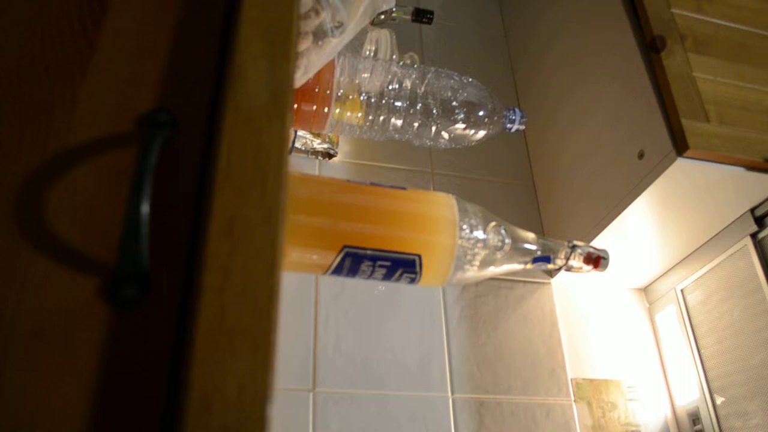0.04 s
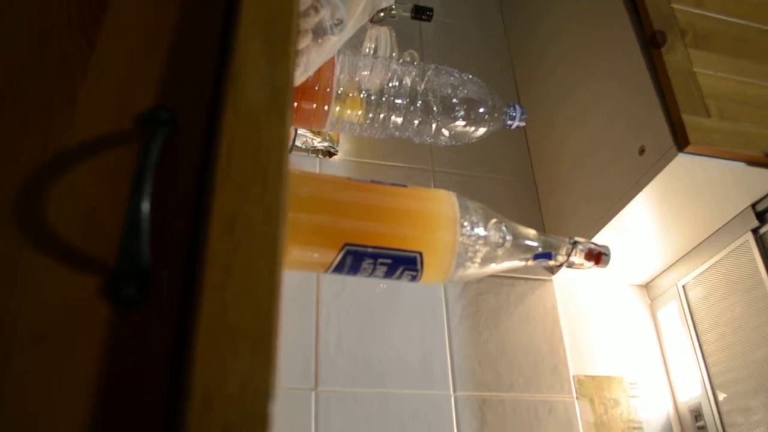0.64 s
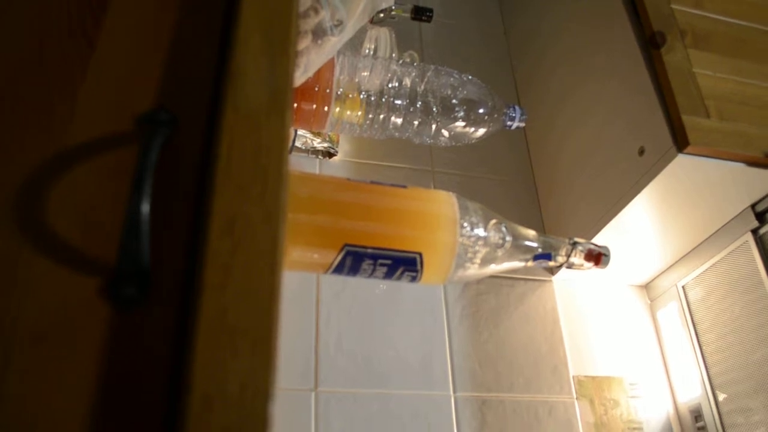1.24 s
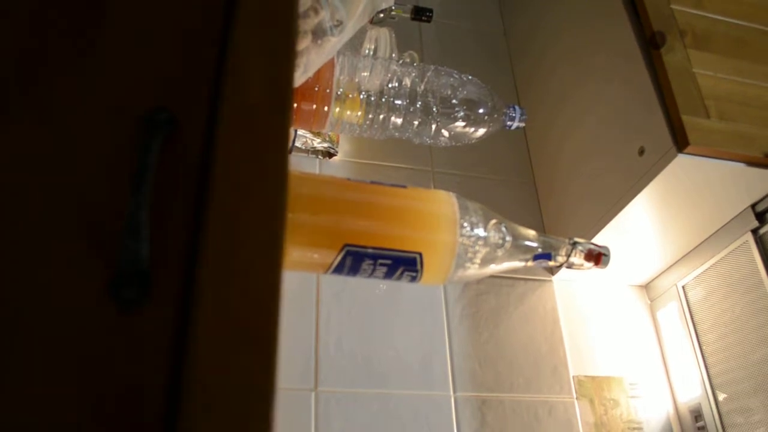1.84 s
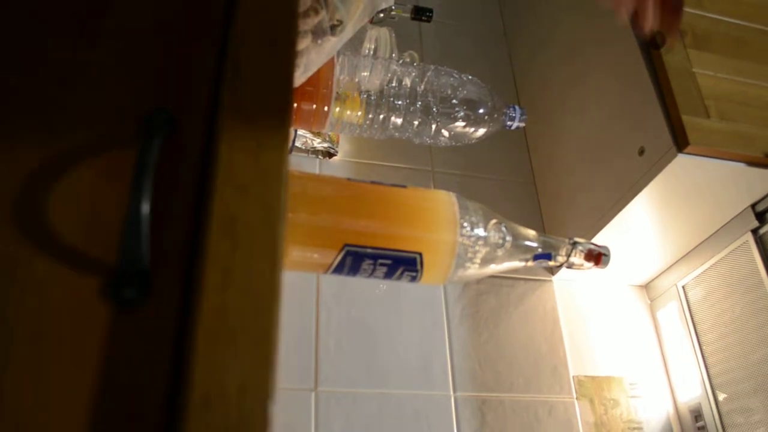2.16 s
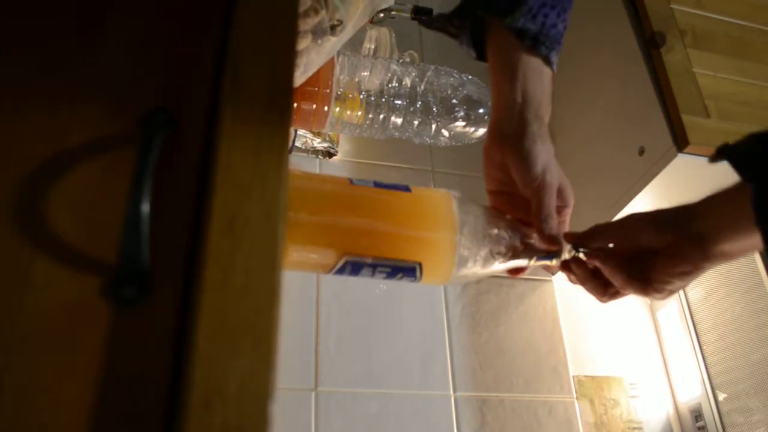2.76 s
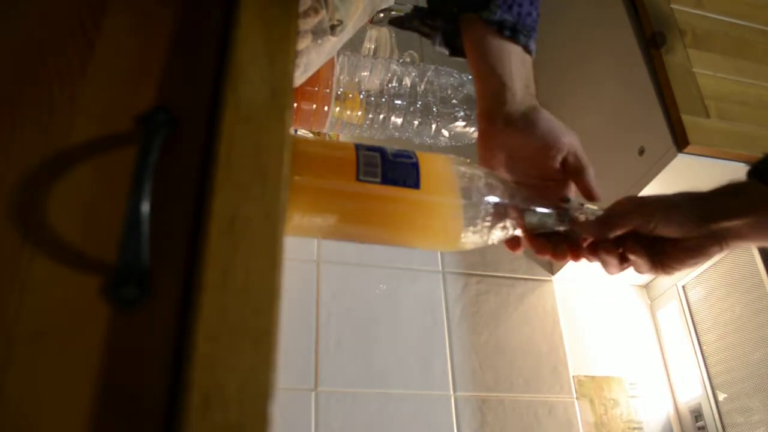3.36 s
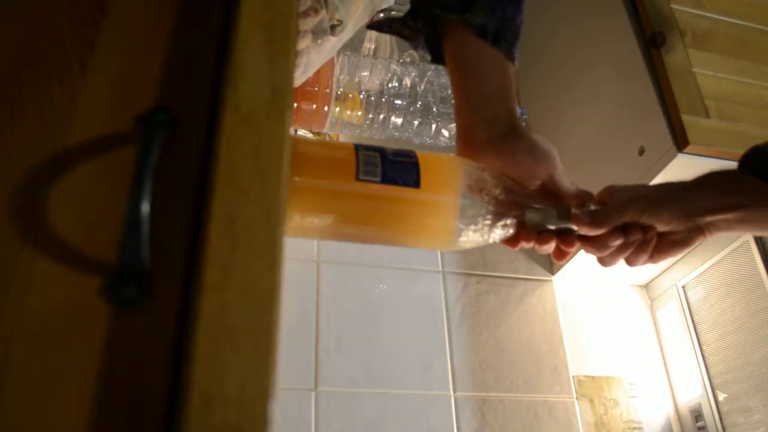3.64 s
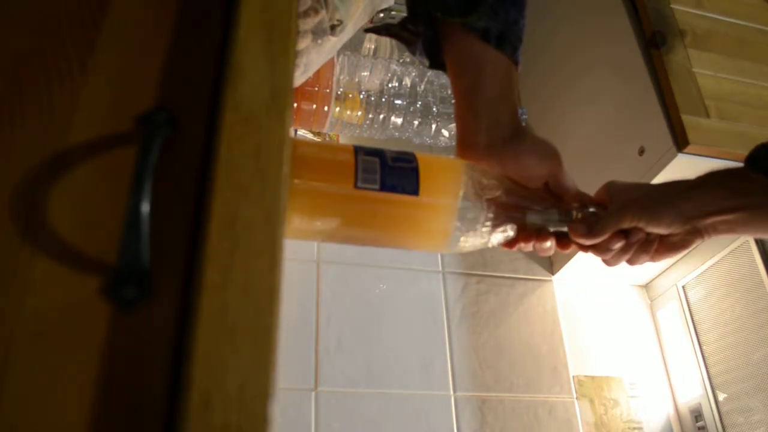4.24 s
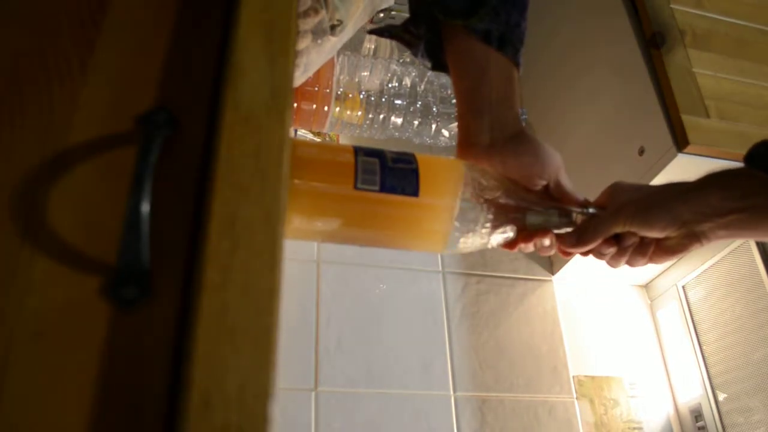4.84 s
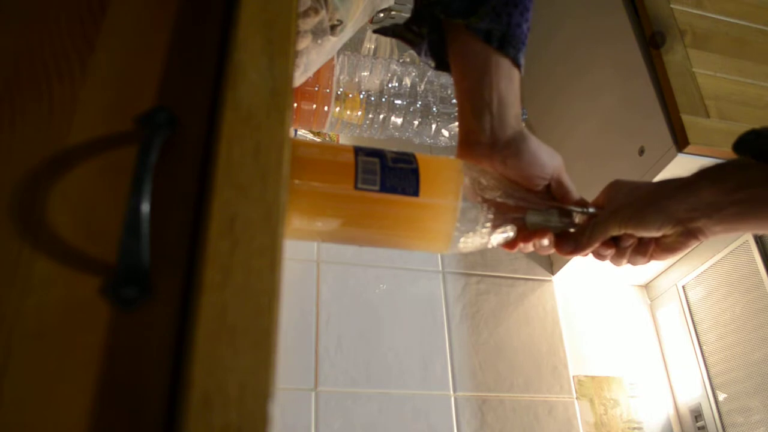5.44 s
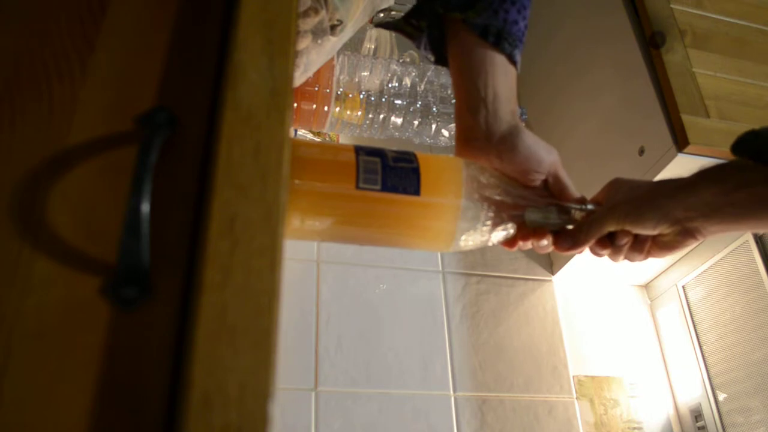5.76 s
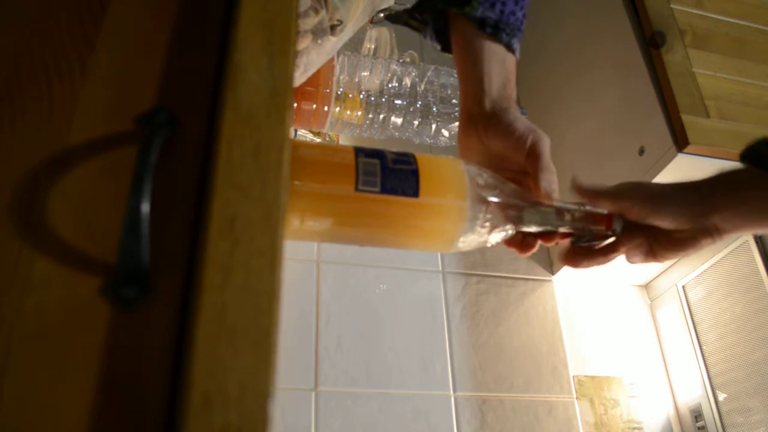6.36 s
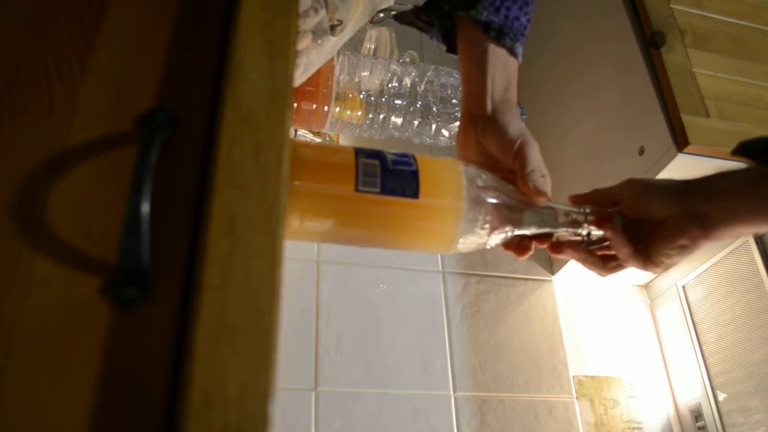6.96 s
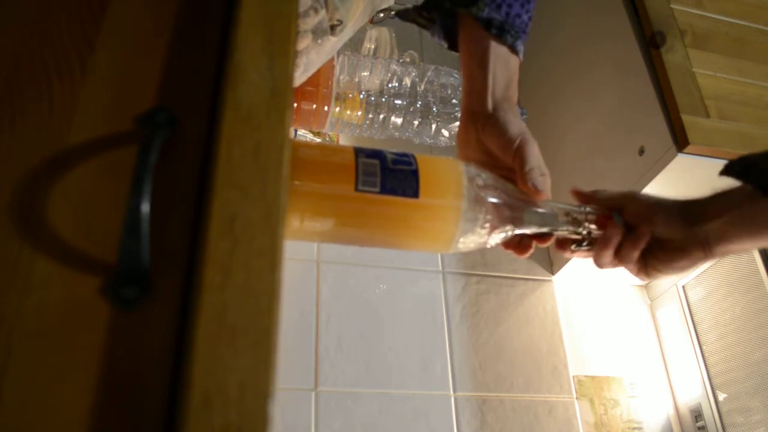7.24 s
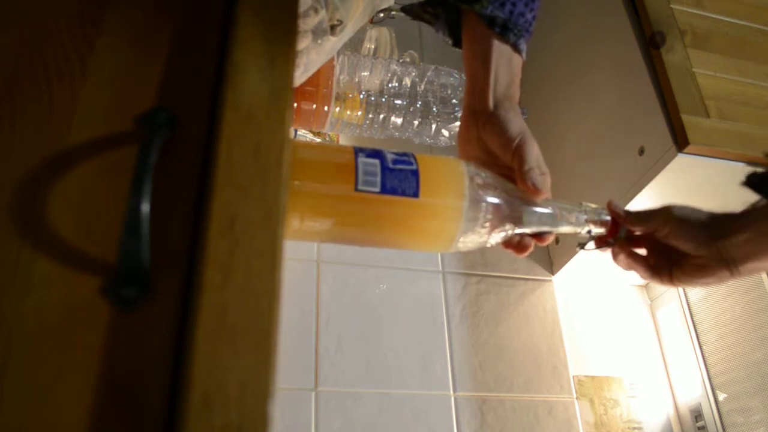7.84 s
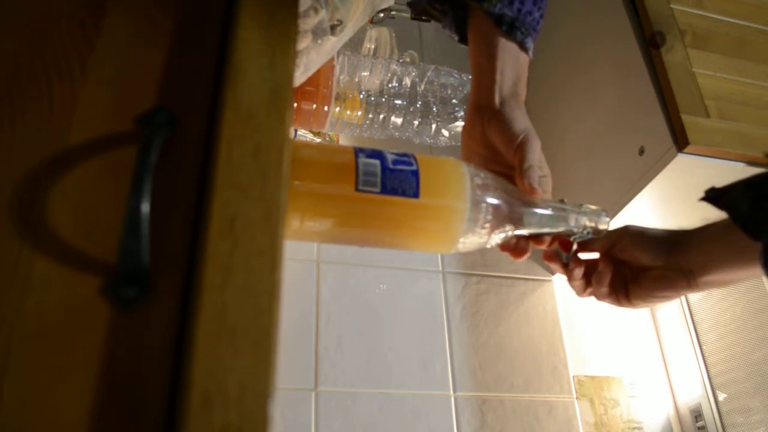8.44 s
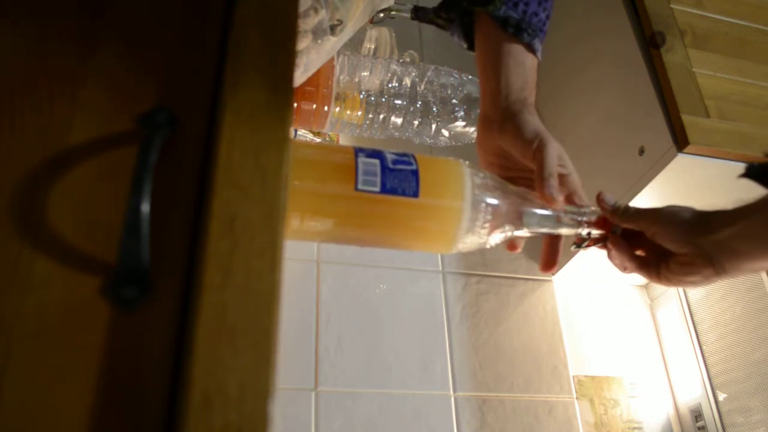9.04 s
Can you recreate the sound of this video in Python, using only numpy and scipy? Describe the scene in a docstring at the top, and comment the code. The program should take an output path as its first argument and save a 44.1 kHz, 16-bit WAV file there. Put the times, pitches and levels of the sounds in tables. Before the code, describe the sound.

In a quiet tiled kitchen, sleeves rustle faintly and a glass bottle bumps softly on the counter. Its swing-top is eased open, and gas bursts past the seal in two loud, short hisses with a hollow tone. The wire clasp then clicks and clinks against the glass among more soft bumps, and a last faint leak slips out. One microphone picks up direct sound with a short room echo.

```python
"""A swing-top glass bottle of fizzy drink, eased open on the counter of a small tiled kitchen.
Gas bursts past the rubber seal in two hisses that sound a hollow resonance at the mouth. Around them
sleeves rustle, the bottle bumps on the worktop, and the wire clasp clicks and clinks against the glass;
a last faint leak slips out. One microphone hears the counter, direct sound ahead of the echo off the
tiles, with a few small ticks close by and quiet room tone behind."""
import sys
import numpy as np
from scipy import signal
from scipy.fft import rfft, irfft, next_fast_len
from scipy.io import wavfile

SR = 44100
rng = np.random.default_rng(int(sys.argv[2]) if len(sys.argv) > 2 else 0)


def dump_mix(stems):
    """Bounce the given channels to the path in sys.argv[1] as a 16-bit WAV at rate SR."""
    frames = np.atleast_2d(stems).T  # one column per channel
    limited = np.clip(frames, -1, 1)  # hard clip at full scale
    pcm = np.round(limited * 32767).astype(np.int16)
    wavfile.write(sys.argv[1], SR, pcm)


N = 401751
TIME = np.arange(N) / SR


def from_db(db):
    """Decibels to gain."""
    return 10 ** (np.asarray(db) / 20)


def rms_one(x):
    """Scale to unit rms."""
    return x / np.sqrt(np.mean(x ** 2) + 1e-20)


def at_hz(points, hz):
    """Read a table on a log-frequency axis."""
    known_hz, values = np.transpose(points)
    return np.interp(np.log(np.maximum(hz, 1)), np.log(known_hz), values)


def noise(spectrum, skirt_db=24):
    """Steady noise of a given spectral density, falling skirt_db an octave past its ends; rms 1."""
    size = next_fast_len(N)
    hz = np.maximum(np.arange(size // 2 + 1) * SR / size, 1)
    octaves_outside = np.abs(np.log2(hz / np.clip(hz, spectrum[0][0], spectrum[-1][0])))
    gain = from_db(at_hz(spectrum, hz) - skirt_db * octaves_outside)
    return rms_one(irfft(rfft(rng.standard_normal(size)) * gain, size)[:N])


def band(x, low_hz, high_hz):
    """Band-pass filter."""
    sos = signal.butter(2, [low_hz, min(high_hz, .45 * SR)], "band", fs=SR, output="sos")
    return signal.sosfilt(sos, x)


def drift(rate_hz):
    """Smooth random wander, spread 1."""
    hop = 40
    r = np.exp(-2 * np.pi * rate_hz * hop / SR)
    slow = signal.lfilter([1], [1, -2 * r, r * r], rng.standard_normal(N // hop + 2002))[2000:]
    return np.interp(np.arange(N) / hop, np.arange(len(slow)), rms_one(slow))


def resonance(x, hz, width_hz):
    """Two-pole resonance with gain 1 at its peak."""
    r = np.exp(-np.pi * width_hz / SR)
    feedback = [1, -2 * r * np.cos(2 * np.pi * hz / SR), r * r]
    return signal.lfilter(np.array([1, 0, -1]) * (1 - r * r) / 2, feedback, x)


def strike(times, db, modes, spread_db):
    """Blows set every mode ringing, each with a random strength of its own."""
    ringing = np.zeros(N)
    for hz, mode_db, t60 in modes:
        scatter_db = spread_db * rng.standard_normal(len(db))
        blows = np.full(N, 1e-18)
        blows[(times * SR).astype(int)] = from_db(db + mode_db + scatter_db)
        r, w = 1e-3 ** (1 / (t60 * SR)), 2 * np.pi * hz / SR
        mode = signal.lfilter([0, np.sin(w)], [1, -2 * r * np.cos(w), r * r], blows)
        ringing += rng.choice([-1, 1]) * mode
    return ringing


def decays(times, db, t60):
    """Envelope that jumps at each contact and dies away."""
    jumps = np.full(N, 1e-18)
    jumps[(np.asarray(times) * SR).astype(int)] = from_db(db)
    return signal.lfilter([1], [1, -1e-3 ** (1 / (t60 * SR))], jumps)


def swell(centre_s, sigma_s, db):
    """Bell-shaped envelope."""
    return from_db(db) * np.exp(-np.minimum(((TIME - centre_s) / sigma_s) ** 2 / 2, 20))


def room_tone(whine_hz=1740, whine_db=-14, hum_hz=268, hum_db=-20, fade_in_s=0.51):
    """The kitchen's steady background, with a faint fan-like whine and hum; it swells in at first."""
    # colour of the background: f/Hz, level/dB
    air = [(15, -43), (25, -12.5), (86, -1.5), (136, -6.5), (178, -2), (331, -8), (445, -7), (722, -5.5),
           (782, -6.5), (970, -5), (1110, -7), (1750, -9.5), (3440, -23), (6550, -35.5), (15500, -40.5)]
    # its slow rise and fall: t/s, level/dB
    air_level = [(.6, -58), (2.4, -56), (5, -58.5), (9.1, -58)]
    fade_in = np.minimum(TIME / fade_in_s, 1) ** 2.94
    level = from_db(np.interp(TIME, *np.transpose(air_level))) * fade_in
    whine = rms_one(resonance(rng.standard_normal(N), whine_hz, width_hz=29))
    hum = rms_one(resonance(rng.standard_normal(N), hum_hz, width_hz=10))
    return level * (noise(air) + from_db(whine_db) * whine + from_db(hum_db) * hum)


def ticks(width_hz=450):
    """Small squeaky ticks near the microphone, each a short burst of pitched noise."""
    # ticks: t/s, level/dB, f/Hz
    events = [(.21, -64, 1870), (.237, -60, 2200), (0.245, -50.5, 1160), (0.263, -64, 1700),
              (.262, -63.5, 3460), (6.857, -67, 4440)]
    white = rng.standard_normal(N)
    sound = np.zeros(N)
    for at, db, hz in events:
        tick = decays([at], [db], t60=0.046) * rms_one(resonance(white, hz, width_hz))
        sound += band(tick, hz / 1.4, hz * 1.8)
    return sound


def hands(grain_db=2):
    """Grainy swish of sleeves as the arms reach in and shift, and duller rubbing of fingers."""
    # sleeves brushing: t/s, sigma/s, level/dB
    swishes = [(0.618, .008, -60), (1.296, .035, -71), (1.75, .17, -72), (2.42, 0.2, -66),
               (2.8, 0.037, -58), (3.023, 0.027, -57.5), (3.115, 0.046, -59.5), (7.716, .008, -53.5)]
    # colour of the cloth: f/Hz, level/dB
    cloth = [(200, -7), (700, 0), (1500, 16), (2600, 16.5), (4000, 4), (7000, -3), (9500, -6), (12500, -7),
             (15500, -17)]
    # fingers rubbing on the bottle: t/s, sigma/s, level/dB
    rubs = [(2.82, 0.027, -57), (4.246, 0.017, -50), (6.527, 0.024, -59.5), (6.841, .05, -59),
            (7.635, 0.023, -52), (7.71, .019, -55), (8.974, 0.1, -58)]
    # colour of skin on glass: f/Hz, level/dB
    skin = [(45, 6.5), (80, 11.5), (150, -4), (350, 2.5), (800, 4), (1500, 2.5), (2600, -10.5), (4000, -24)]
    sleeves = sum(swell(*swish) for swish in swishes) * noise(cloth)
    fingers = sum(swell(*rub) for rub in rubs) * noise(skin)
    return (sleeves + fingers) * from_db(grain_db * drift(70))


def worktop(top_hz=1000):
    """The heavy bottle makes the counter boom; harder contacts add more of a wooden knock."""
    # bottle bumping down: t/s, level/dB, relative knock level/dB
    bumps = [(2.654, -56, -15), (3.507, -39.5, 1.5), (4.968, -48, -14), (6.054, -53.5, -13),
             (6.764, -54, -11), (7.687, -45.5, -5), (7.755, -49.5, 4.5), (8.458, -58, -9),
             (8.876, -46.5, -2)]
    # modes of the worktop: f/Hz, level/dB, t60/s
    modes = [(50, -2.5, 0.093), (71, 2.5, .15), (82.5, 1.5, .2), (123, -1.5, .15), (183.9, -9.5, .25)]
    # colour of the knock: f/Hz, level/dB
    wood = [(110, -1.5), (200, 1.5), (280, -5), (365, 1), (520, -11), (770, -11.5), (1100, -26.5)]
    times, db, knock_db = np.transpose(bumps)
    boom = strike(times + 0.0012, db, modes, spread_db=2.5)
    knock = decays(times, db + knock_db, t60=0.2) * noise(wood)
    return band(boom + knock, 35, top_hz)


def clasp(crack_db=-21.5):
    """The wire lever snaps over the neck, and the loose wire rings where it touches the glass."""
    # snaps: t/s, level/dB, relative knock level/dB, relative upper snap level/dB
    clicks = [(4.226, -50, 4, -10), (6.5633, -48, -4, -4.5), (7.114, -54, -6, -13), (7.148, -45, -7.5, -22),
              (7.6806, -39.5, -0.5, -22), (7.7544, -36, -10, -13.5), (7.9243, -56.5, -11, -10.5),
              (8.3489, -56.5, -5.5, -14), (8.49, -52, -10, -21.5), (8.5425, -55.5, -4, -22)]
    # colour of a snap: f/Hz, level/dB
    snap_colour = [(1100, -8), (2000, 0), (2800, 6.5), (3600, -8), (5500, -23)]
    # wire touching glass: t/s, level/dB
    clinks = [(4.9588, -64), (6.4954, -64), (7.1162, -50), (7.1472, -57), (7.722, -68), (8.4883, -57.5),
              (8.542, -59.5), (8.8204, -68.5), (8.8688, -61)]
    # modes of a clink: f/Hz, level/dB, t60/s
    wire_modes = [(2073, -8.5, .1), (2500, -11, .12), (2650, -3, 0.1), (2840, -2, .13), (3000, -2, 0.11),
                  (3095, -0.5, 0.089), (3340, -13, .12), (4396, -20, .12), (10100, -28, .06)]
    times, db, knock_db, upper_db = np.transpose(clicks)
    white = rng.standard_normal(N)
    snap = decays(times, db, t60=0.031) * noise(snap_colour)
    knock = decays(times, db + knock_db, t60=0.073) * rms_one(band(white, 910, 1650))
    upper = decays(times, db + upper_db, t60=0.031) * rms_one(band(white, 3700, 5400))
    treble = rms_one(band(band(white, 6700, 12800), 6700, 12800))
    crack = decays(times, db + crack_db, t60=0.05) * treble
    ring = strike(*np.transpose(clinks), wire_modes, spread_db=3.5)
    return snap + band(knock, 330, 4000) + upper + crack + ring


def flow_gain(full_db, db_per_flow_db, attack_curve, full_flow_db=-17):
    """Gain of one part of the hiss: each burst opens, holds and dies away as the pressure drops."""
    # the seal lets gas through: t/s, opening/s, hold/s, peak flow/dB, fall of flow/(dB/s)
    bursts = [(5.287, 0.039, 0.058, -17.5, 121.5), (5.56, 0.084, 0.072, -38.5, 188),
              (5.687, .056, .066, -26.5, 182), (8.865, 0.15, .11, -72.5, 59.5)]
    power = 1e-20
    for start, opening_s, hold_s, peak_db, fall_db_per_s in bursts:
        age = TIME - start
        flow_db = peak_db - fall_db_per_s * np.maximum(age - opening_s - hold_s, 0)
        opened = np.clip(age / opening_s, 0, 1) ** attack_curve
        power += (opened * from_db(full_db + db_per_flow_db * (flow_db - full_flow_db))) ** 2
    return np.sqrt(power)


def mouth_tone(width_hz):
    """Turbulence sounds the cavity at the mouth as a breathy, gliding tone."""
    # its pitch sags after the first hiss, rises for the second, glides down in the last leak: t/s, f/Hz
    pitch = [(5.3, 1557), (5.42, 1415), (5.63, 1390), (5.71, 1546), (6.05, 1562), (8.96, 1700),
             (9.11, 1440)]
    phase = 2 * np.pi * np.cumsum(np.interp(TIME, *np.transpose(pitch))) / SR
    return rms_one(drift(width_hz) * np.cos(phase) + drift(width_hz) * np.sin(phase))


def gas(sputter_db=1.5):
    """Gas escapes past the seal: mouth resonance, jet, sizzle, a low rush at full flow, brief whistles."""
    # the cavity catches and sings out: t/s, sigma/s, boost/dB
    flares = [(5.338, 0.012, 5), (5.701, 0.0083, 7), (5.813, 0.021, 6), (8.95, 0.048, 8)]
    # colour of the jet: f/Hz, level/dB
    jet = [(500, -26.5), (900, -8.5), (1400, -3), (2100, -1), (2900, 1.5), (4200, 2.5), (5200, -6.5),
           (7000, -18.5), (12000, -37)]
    # colour of the high sizzle: f/Hz, level/dB
    sizzle = [(3000, -24), (5500, -0.5), (7500, -0.5), (9000, -3), (11500, -1), (13500, -4.5),
              (16000, -14.5)]
    # colour of the low rush: f/Hz, level/dB
    rush = [(130, -19.5), (180, -8), (250, -6), (330, -10), (410, -3), (600, 1), (1000, -0.5), (1600, -22)]
    # thin whistles and spits at the seal: t/s, sigma/s, f/Hz, width/Hz, level/dB
    whistles = [(5.63, 0.046, 10040, 121.5, -48.5), (5.755, .016, 7050, 397, -29.5),
                (5.766, 0.0062, 5000, 1200, -25.5)]
    mouth_gain = flow_gain(full_db=-20, db_per_flow_db=0.74, attack_curve=0.9)
    jet_gain = flow_gain(full_db=-18, db_per_flow_db=1, attack_curve=1.05)
    sizzle_gain = flow_gain(full_db=-21, db_per_flow_db=1.09, attack_curve=0.78)
    rush_gain = flow_gain(full_db=-31.5, db_per_flow_db=1.5, attack_curve=2.1)
    # a strong jet damps the cavity and widens its resonance; a gentle one lets it sing
    breathy = np.interp(20 * np.log10(jet_gain), [-28, -18], [.65, .97])
    mouth = np.sqrt(breathy) * mouth_tone(width_hz=220) + np.sqrt(1 - breathy) * mouth_tone(width_hz=53)
    flare_db = sum(boost_db * swell(at, sigma_s, 0) for at, sigma_s, boost_db in flares)
    hiss = mouth_gain * from_db(flare_db) * band(mouth, 750, 3200)
    hiss += jet_gain * noise(jet) + sizzle_gain * noise(sizzle) + rush_gain * noise(rush)
    turbulence = rng.standard_normal(N)
    for at, sigma_s, hz, width_hz, db in whistles:
        hiss += swell(at, sigma_s, db) * rms_one(resonance(turbulence, hz, width_hz))
    return hiss * from_db(sputter_db * drift(50))   # the wet seal makes the flow flutter


def alcove(x, width_hz=16, ring_db=-2.5):
    """The hard walls close around the bottle ring at their standing waves."""
    # standing waves between bottle, tiles and cupboard: f/Hz, relative level/dB
    standing = [(245, -1), (560, -4), (890, -2), (1305, -3), (1368, -2), (1447, -9), (1497, -6.5),
                (1555, -1), (1646, -5), (1740, -6.5), (2093, -3), (2428, -3), (2609, -3.5), (2822, 1),
                (2960, -1.5), (3088, 2.5), (3344, -3.5), (3591, -4.5), (3982, -1.5), (4225, -1.5),
                (5009, -1), (6214, 0), (7092, -1), (7676, -1)]
    return x + sum(from_db(db + ring_db) * resonance(x, hz, width_hz) for hz, db in standing)


def kitchen(x, wet_db, first_echo_s=0.003):
    """Direct sound plus dense reflections off the tiles, which linger longest in the upper mids."""
    # reverberation time of the room: f/Hz, t60/s
    t60s = [(100, 0.25), (500, 0.33), (1500, .44), (4000, 0.47), (8000, .33), (15000, .24)]
    t = TIME[:SR * 3 // 4]
    edges_hz = np.geomspace(40, 18000, 13)
    tail = np.zeros(len(t))
    for low, high in zip(edges_hz, edges_hz[1:]):
        t60 = at_hz(t60s, np.sqrt(low * high))
        tail += band(rng.standard_normal(len(t)), low, high) * 1e-3 ** (t / t60)
    tail *= t > first_echo_s
    echoes = signal.fftconvolve(x, tail / np.linalg.norm(tail))[:N]
    return (x + from_db(wet_db) * echoes) / np.hypot(1, from_db(wet_db))


def scene():
    """The counter sounds into the kitchen; close ticks and room tone reach the microphone dry."""
    counter = alcove(gas()) + clasp() + hands() + worktop()
    return (kitchen(counter, wet_db=-7) + ticks() + room_tone())[None]


def record(dry, cutoff_hz=15800):
    """The microphone's signal passes a steep low-pass filter."""
    return signal.sosfilt(signal.ellip(12, .1, 80, cutoff_hz, fs=SR, output="sos"), dry)


dry = scene()
out = record(dry)
dump_mix(out)
```